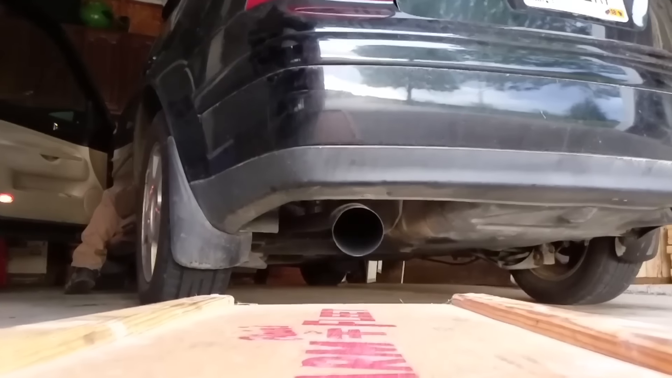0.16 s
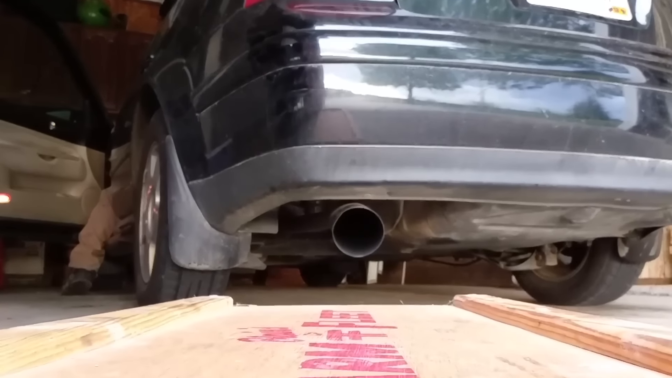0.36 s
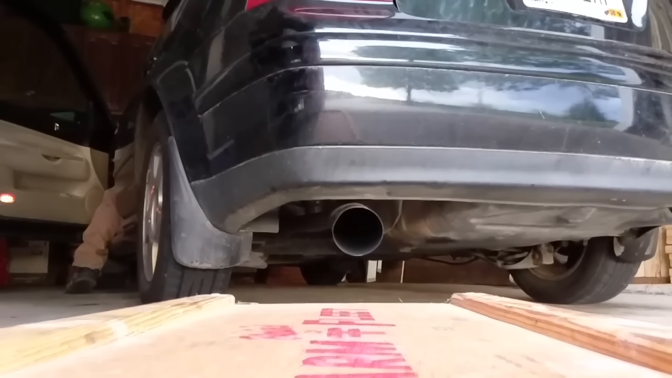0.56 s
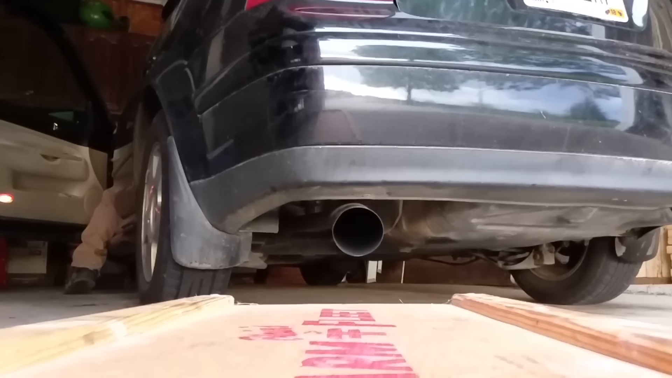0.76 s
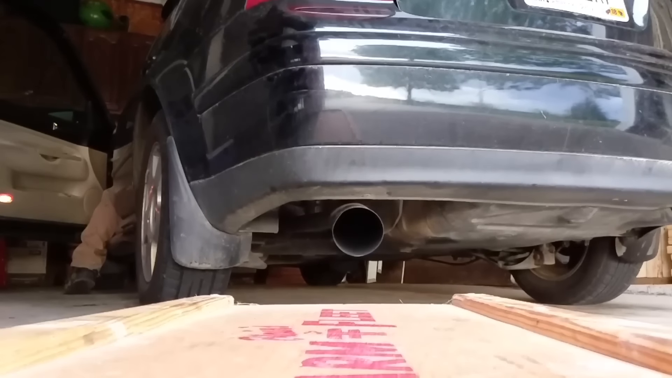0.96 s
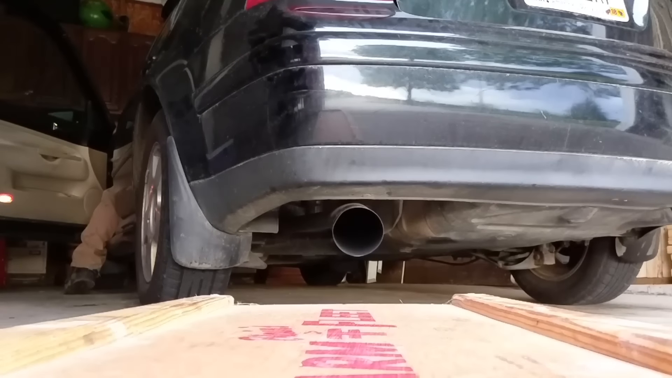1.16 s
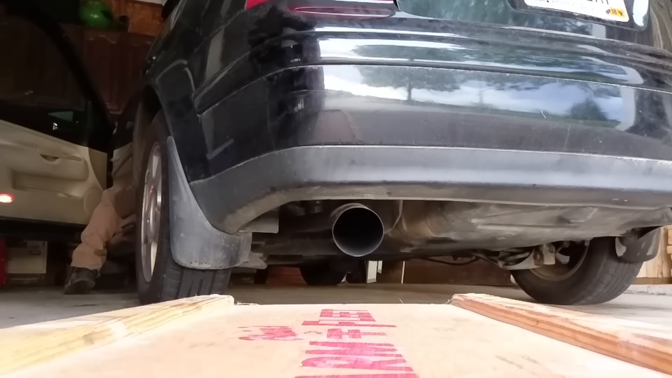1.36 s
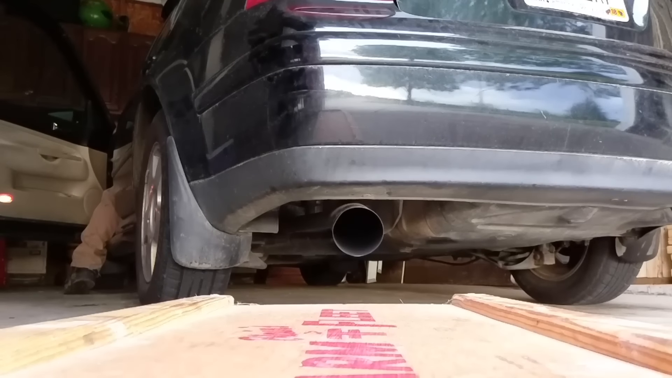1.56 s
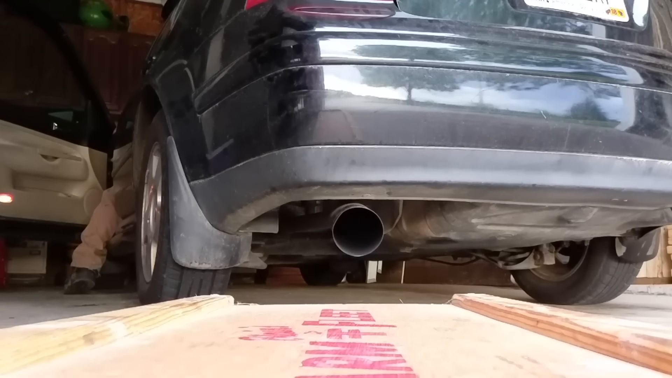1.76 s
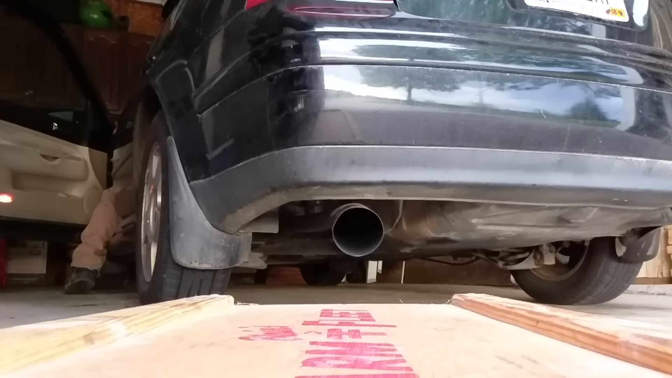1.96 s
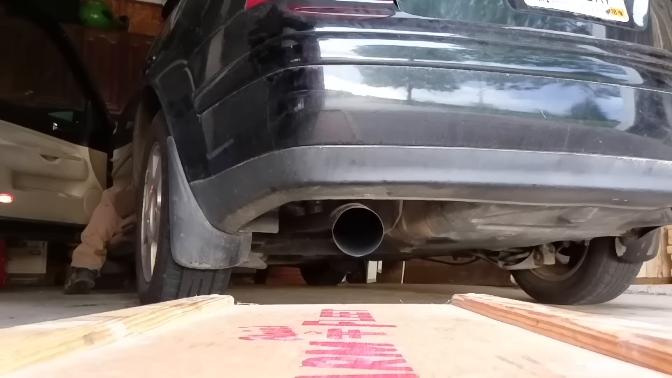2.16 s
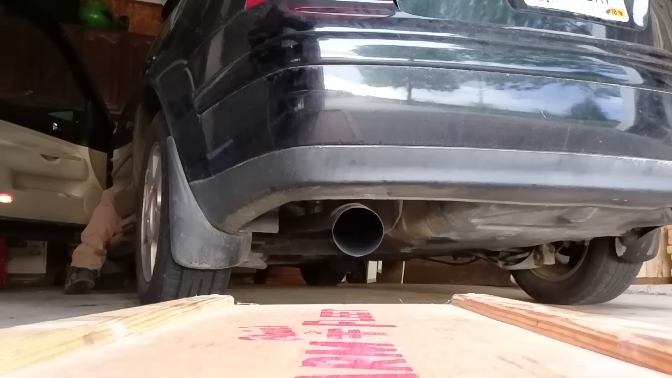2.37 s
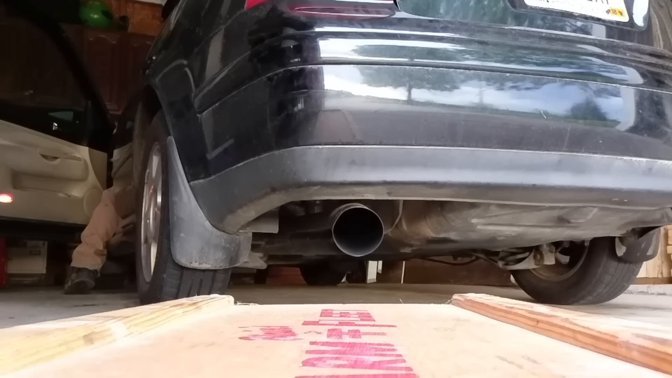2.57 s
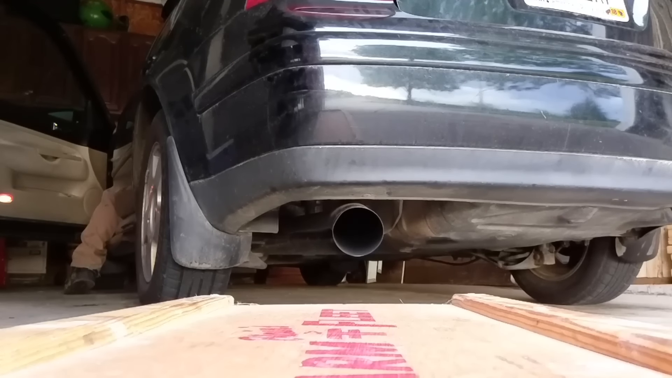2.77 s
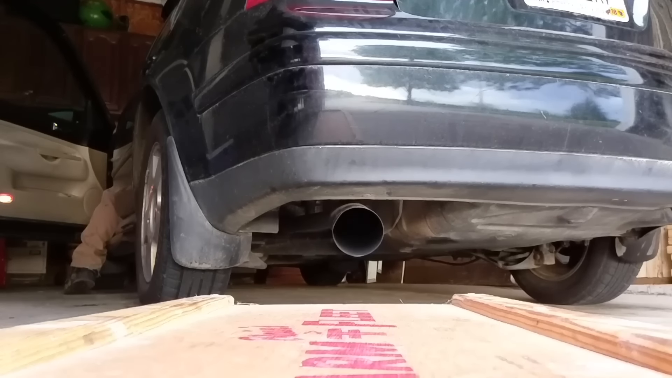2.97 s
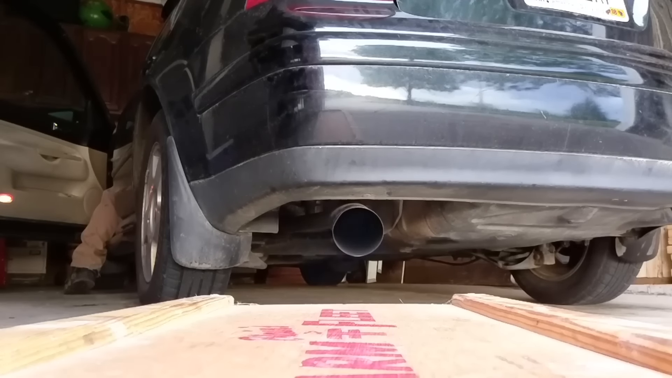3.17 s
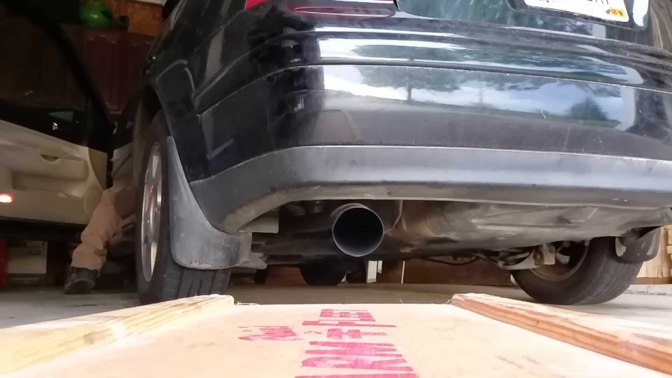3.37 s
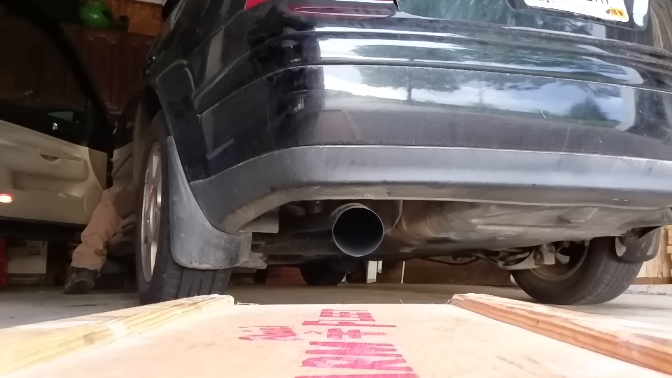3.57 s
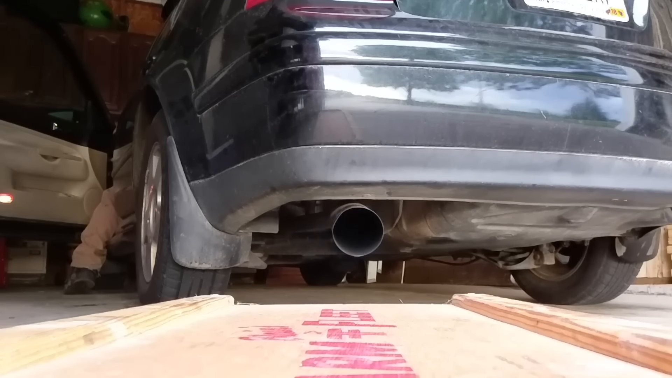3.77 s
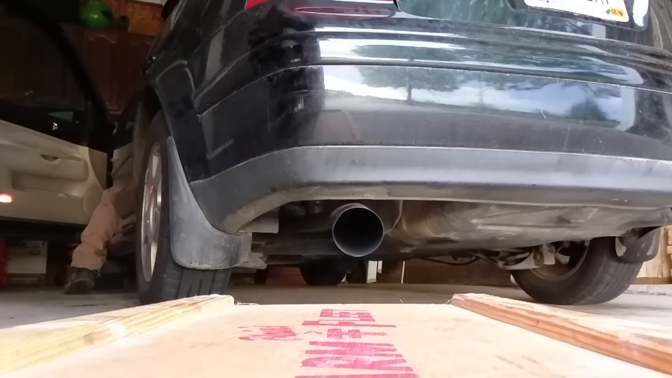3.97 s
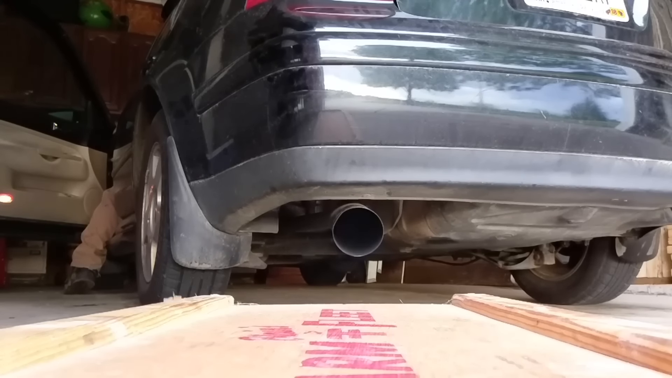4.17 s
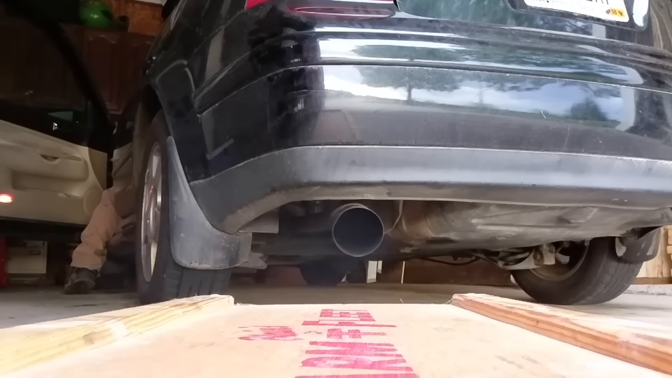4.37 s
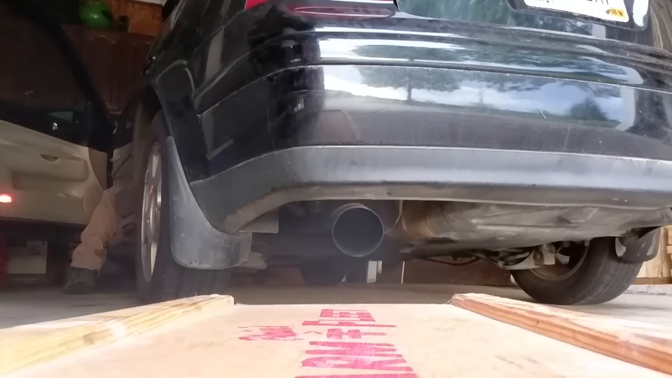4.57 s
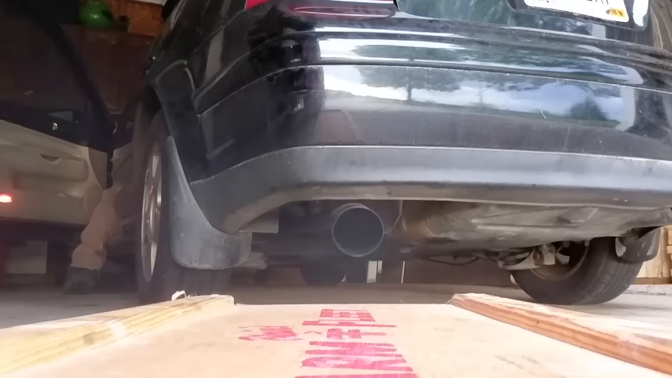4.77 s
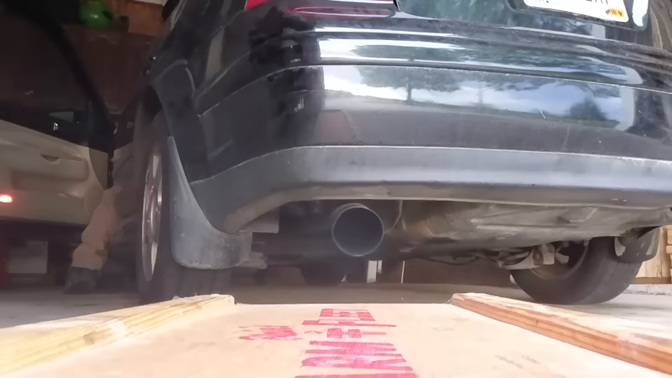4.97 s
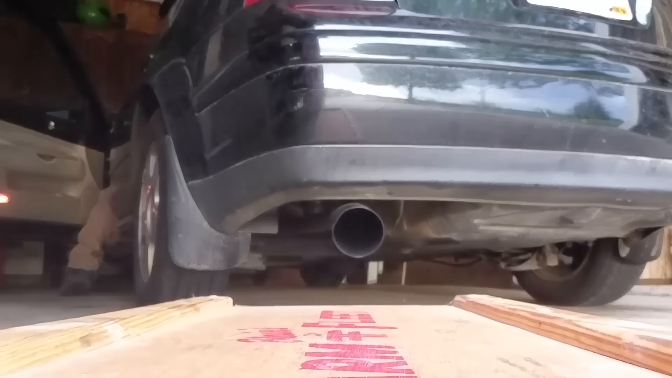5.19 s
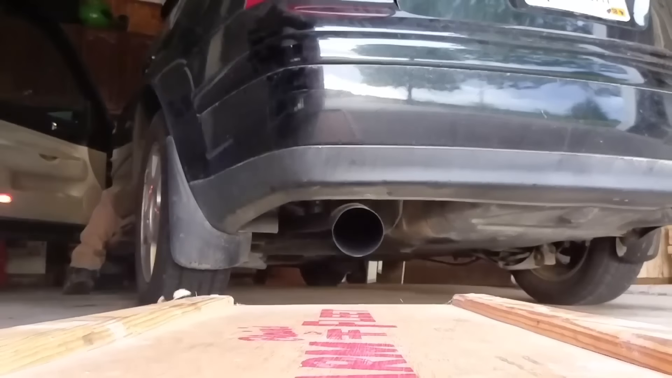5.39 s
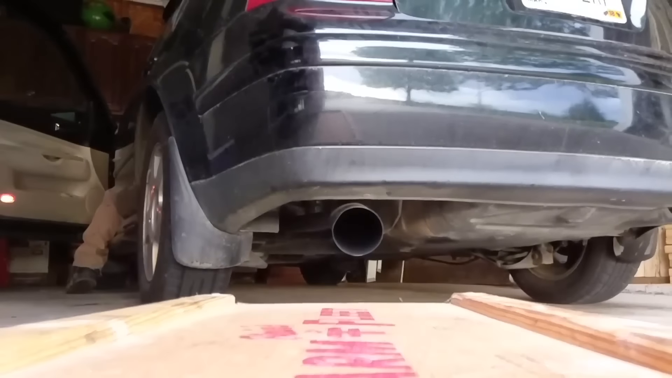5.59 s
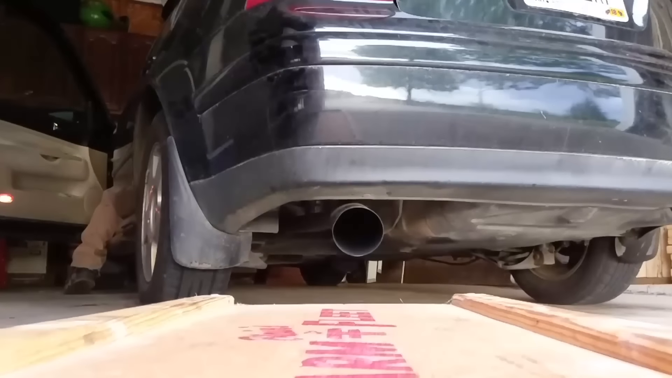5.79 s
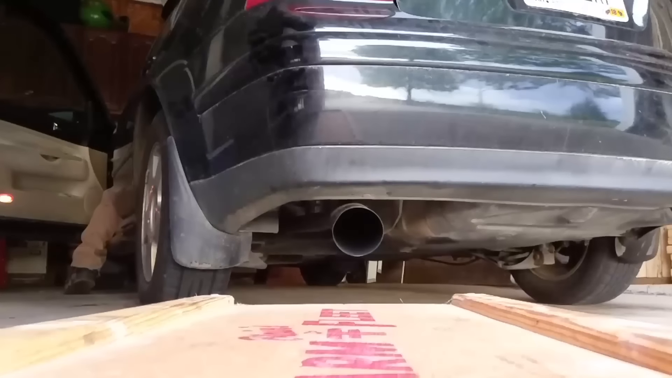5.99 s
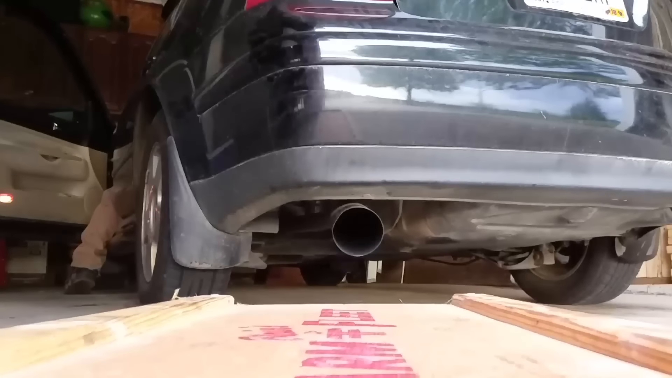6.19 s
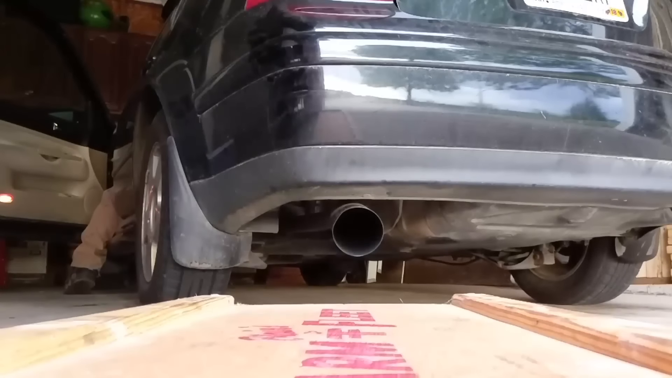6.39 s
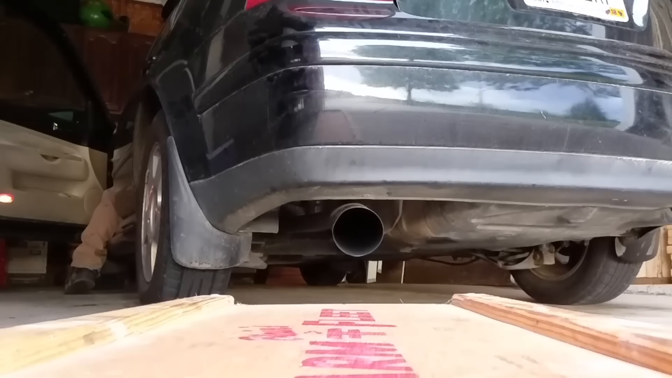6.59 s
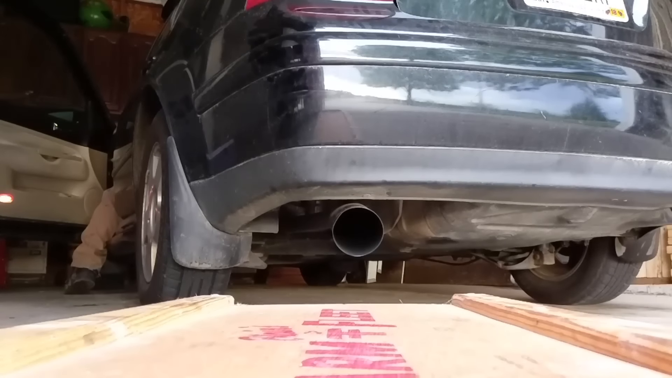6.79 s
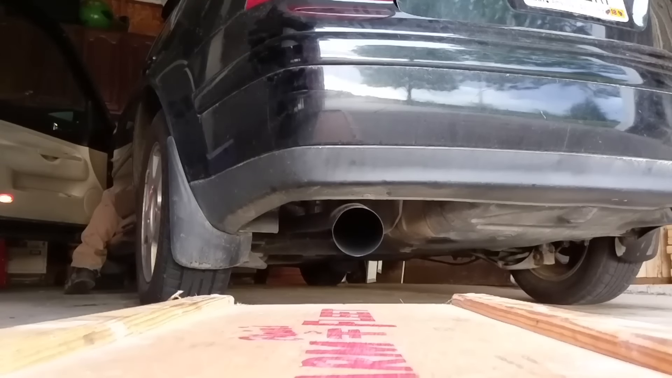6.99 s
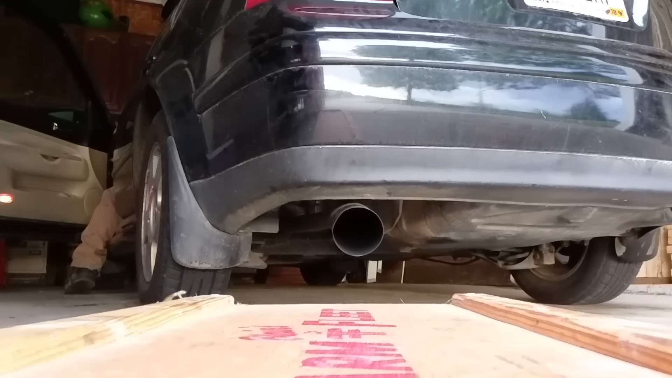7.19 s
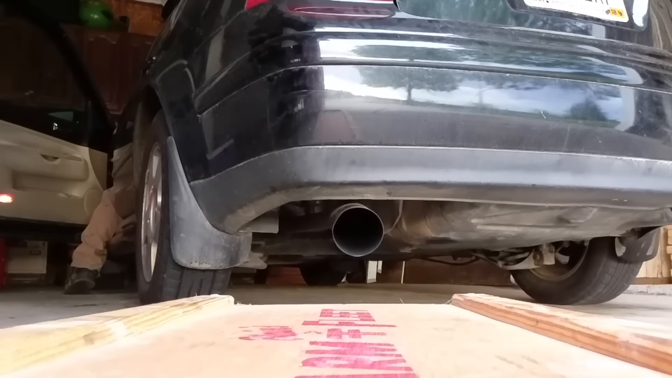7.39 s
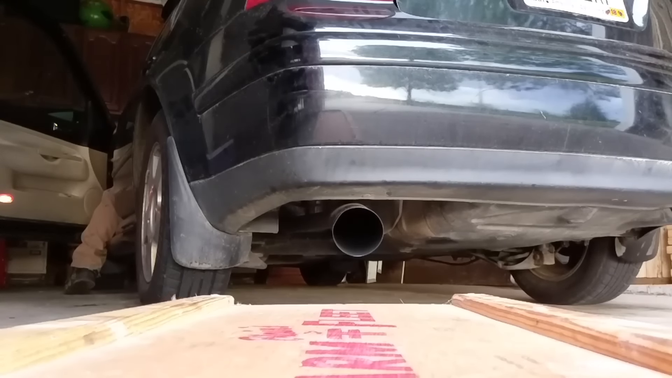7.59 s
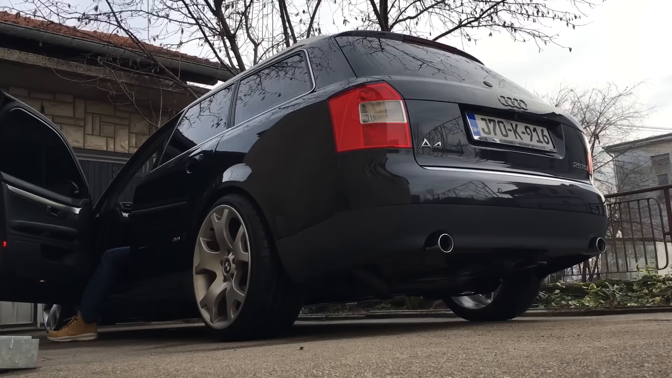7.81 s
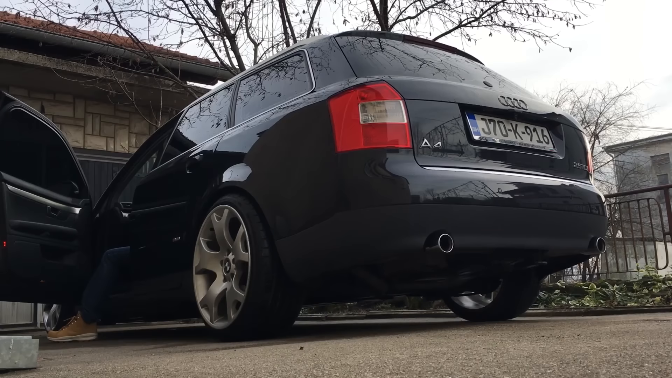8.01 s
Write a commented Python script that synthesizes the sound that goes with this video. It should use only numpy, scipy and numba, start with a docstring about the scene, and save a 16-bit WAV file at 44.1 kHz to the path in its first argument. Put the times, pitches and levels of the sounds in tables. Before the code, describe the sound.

Close behind an open exhaust in a garage: lumpy diesel idle, a short rev, a harder one, whistling turbo run-down, then an abrupt cut outdoors.

```python
"""Turbo diesel revved in a garage

A four-cylinder turbo diesel with an open pipe idles and is revved twice; a two-port camera lies on the floor behind it.
Pressure pulses excite the standing waves of the pipe as thumps; turbulent gas roars and hisses once a cycle.
The turbine whistles at its blade tone, and flow noise howls through the tailpipe as the revs fall.
The scene then cuts to a quiet driveway: shaped noise rumbles and ringing metal starts to rasp."""
import sys
import numpy as np
from scipy import signal
from scipy.fft import rfft, irfft, next_fast_len
from scipy.io import wavfile
from scipy.ndimage import uniform_filter1d
from numba import njit

SR = 44100
rng = np.random.default_rng(int(sys.argv[2]) if len(sys.argv) > 2 else 0)


def unload_audio(sound):
    """Save the sound as a 16-bit wav file, at the path given as the first command line argument."""
    columns = np.transpose(np.atleast_2d(sound))
    # keep every value between -1 and 1, then stretch to whole-number steps
    steps = np.round(np.clip(columns, -1, 1) * 32767)
    wavfile.write(sys.argv[1], SR, steps.astype(np.int16))


N = 355005
T = np.arange(N) / SR


def undb(db):
    """Level to amplitude: 20 dB is a factor of ten."""
    return 10 ** (np.asarray(db) / 20)


def unit(x):
    """Normalisation: scale to rms 1."""
    return x / np.sqrt(np.mean(x ** 2))


def curves(table):
    """Linear interpolation: each column after t/s becomes one value a sample."""
    s, *columns = np.transpose(table)
    return [np.interp(T, s, column) for column in columns]


def bumps(table):
    """Superposition of raised-cosine swells: one track a column after centre t/s and half length/s."""
    at, half, *columns = np.transpose(table)[:, :, None]
    shape = np.cos(np.pi / 2 * np.clip((T - at) / half, -1, 1)) ** 2
    return [np.sum(column * shape, axis=0) for column in columns]


def walk(rate):
    """Random modulation: normal levels held 1 / rate s and smoothed twice, spread near 1."""
    k = int(SR / rate)
    steps = np.repeat(rng.standard_normal(N // k + 1), k)
    return 1.256 * uniform_filter1d(uniform_filter1d(steps, k), k)[:N]


def band(lo_hz, hi_hz):
    """Band-limited noise: white noise filtered between two edges, rms 1."""
    sos = signal.butter(2, [lo_hz, hi_hz], "band", fs=SR, output="sos")
    return unit(signal.sosfilt(sos, rng.standard_normal(N)))


@njit
def svf(x, hz, width):
    """Tuned resonance: a state-variable band-pass with a moving centre, gain 1 there."""
    y, b, l = np.empty(len(x)), 0., 0.  # b and l: states of the two integrators
    for i in range(len(x)):
        g, k = np.tan(np.pi * hz[i] / SR), width / hz[i]
        v = (b + g * (x[i] - l)) / (1 + g * (g + k))
        b, l, y[i] = 2 * v - b, l + 2 * g * v, k * v
    return y


def narrow(hz, width_hz, second_width=1.8):
    """Narrow-band noise: two resonances in series around a moving centre, rms 1."""
    once = svf(rng.standard_normal(N), hz, width_hz)
    return unit(svf(once, hz, second_width * width_hz))


def sweep(table, width_hz):
    """Swept narrow-band noise: follows a (t/s, f/Hz, level/dB) table, silent outside its times."""
    hz, db = curves(table)
    inside = (T >= table[0][0]) * (T <= table[-1][0])
    return narrow(hz, width_hz) * undb(db) * inside


def modes(x, table):
    """Modal superposition: parallel (f/Hz, width/Hz, level/dB) resonances, neighbours opposite in sign."""
    rung = 0
    for k, (hz, width, db) in enumerate(table):
        rung = rung + (-1) ** k * undb(db) * signal.lfilter(*signal.iirpeak(hz, hz / width, SR), x)
    return rung


def puff(turns, depth, at):
    """Periodic flow modulation: a smooth swell once a firing cycle, mean power near 1."""
    return unit(np.exp(depth * np.cos(2 * np.pi * (turns - at))))


# spectral shape of the distant rumble: (f/Hz, relative level per Hz/dB)
DRIVEWAY_SPECTRUM = [(18, -39), (30, -14), (59, -9), (119, -32), (214, -28), (252, -26.5), (318, -39),
                     (848, -46), (1200, -43), (8000, -79), (10400, -113), (17600, -120)]
# course of the rasp: (t/s, level/dB)
RASP_COURSE = [(8.0, -74), (8.015, -42), (8.03, -25.5), (8.05, -35.5)]
# resonances of the rasping metal: (f/Hz, width/Hz, relative level/dB)
RASP_RESONANCES = [(1630, 68, 2.5), (2450, 140, 1), (3000, 38, -3), (3520, 34, 3), (3910, 39, 4),
                   (5400, 94, -9), (6340, 32, -5)]
DRIVEWAY_DB = -33


def driveway():
    """Spectral shaping and modal ringing: noise as distant rumble, then the start of a metal rasp."""
    hz, db = np.transpose(DRIVEWAY_SPECTRUM)
    log_hz = np.log(np.fft.rfftfreq(N, 1 / SR) + 1)
    colour = undb(np.interp(log_hz, np.log(hz), db))
    rumble = unit(irfft(rfft(rng.standard_normal(N)) * colour, N)) * undb(DRIVEWAY_DB)
    ringing = unit(modes(rng.standard_normal(N), RASP_RESONANCES))
    scrape = undb(-2) * band(640, 3900)
    return rumble + (ringing + scrape) * undb(curves(RASP_COURSE)[0])


# gusts of exhaust gas at the microphone: (centre t/s, half length/s, level over steady rumble/dB)
GAS_GUSTS = [(0, 0.43, 14), (1.35, 1, 11), (2.45, 0.21, 10), (4.4, 2, -20), (6, 0.299, 3), (7.55, 0.59, 18)]
BUFFET_DB = -40.5


def buffet():
    """Turbulent pressure: exhaust gas buffets the microphone as gusty rumble, partly shared by the ports."""
    gusts = undb(BUFFET_DB + bumps(GAS_GUSTS)[0] + 2.6 * walk(25))
    common = band(25, 147)
    return gusts * np.array([common + .4 * band(20, 70) for _ in range(2)])


# thin hiss at full boost: (t/s, centre f/Hz, level/dB)
BOOST_NOISE = [(4.55, 12000, -29), (4.85, 11900, -23.5), (5.1, 11570, -21.5), (5.35, 11530, -34)]


def boost_hiss():
    """Swept narrow-band noise: a thin hiss at full boost."""
    return sweep(BOOST_NOISE, 1300.0)


# resonances of the tailpipe and the gap under the car: (f/Hz, width/Hz, relative level/dB)
TAILPIPE = [(405, 113, -14.5), (458, 57, -7.5), (554.4, 38, -5), (618.5, 27, -2.5), (659, 30.4, -2),
            (787, 33, -9.5), (892, 78, -11), (1024, 31.4, -4), (1095, 60, -8), (1207, 59, -9),
            (1432, 107, -14.5), (1521, 64, -8), (1910, 370, -10)]


def tailpipe(x):
    """Modal resonance: ring the tailpipe and the gap under the car."""
    return modes(x, TAILPIPE)


def at_tail(x, through_db):
    """Resonant transmission: loudest at the standing waves of the tailpipe; some passes straight through."""
    return tailpipe(x) * undb(5.5) + undb(through_db) * x


# flow noise against shaft speed: (shaft f/Hz, level before the tailpipe/dB)
SHAFT_NOISE = [(520, -56), (570, -34), (650, -29), (760, -24.5), (900, -25), (1000, -16.5), (1200, -16),
               (1470, -27), (1620, -25), (1750, -50)]
# added level; the noise dies away late in each run-down: (t/s, level/dB)
SHAFT_COURSE = [(0, 5), (.15, -0.5), (.6, 2), (.75, -15), (2.8, -18), (4.6, -2), (6.75, -1), (6.92, -10)]
SHAFT_QUIET_LOAD, SHAFT_DB_PER_LOAD = 0.22, -120  # load where silencing starts, its slope


def shaft_howl(shaft_hz, load):
    """Flow noise tied to rotation: fluttering bands at shaft speed and, when slow, half of it; load silences them."""
    overload = np.maximum(load - SHAFT_QUIET_LOAD, 0)
    db = np.interp(shaft_hz, *np.transpose(SHAFT_NOISE)) + SHAFT_DB_PER_LOAD * overload
    shaft = narrow(shaft_hz, 105.0) + narrow(shaft_hz / 2, 98.0) * (shaft_hz < 900)
    level = undb(db + curves(SHAFT_COURSE)[0] + 1.24 * walk(14))
    return at_tail(shaft * level, through_db=-2.5)


# bursts of the falling howl: (start t/s, level over the howl/dB, length/s)
HOWL_BURSTS = [(4.604, 6, .03), (5.244, 5, 0.027), (5.282, 8.5, 0.027), (5.348, 9.5, .035),
               (5.39, 12.5, 0.066), (5.482, 14, 0.016), (5.514, 8, 0.012), (5.565, 9, 0.047),
               (5.627, 8, .02), (5.681, 5.5, 0.034), (5.716, 6, 0.014), (5.781, 6.5, 0.031),
               (5.837, 10.5, 0.097), (5.935, 5.5, 0.059), (5.989, 14, .02), (6.016, 9, 0.018),
               (6.049, 7, .03), (6.093, 9, .03), (6.139, -1, .02), (6.165, 8, 0.034)]
BURST_RISE_S = .003


def bursts():
    """Level modulation in dB: each burst jumps up, holds and sinks back."""
    at, db, length = np.transpose(HOWL_BURSTS)[:, :, None]
    since = np.maximum(T - at, 0)
    rise = np.clip(since / BURST_RISE_S, 0, 1)
    return np.max(db * rise * np.exp(-(since / length) ** 2), axis=0)


# falling band of flow noise after the last rev: (t/s, centre f/Hz, base level/dB)
FALLING_BAND = [(4.5, 1210, -40), (4.65, 1200, -18), (4.85, 1040, -18), (5, 887.4, -13.5),
                (5.15, 778.4, -13.5), (5.3, 685, -19.5), (5.6, 655, -18.5), (5.9, 625, -19),
                (6.2, 575, -21), (6.3, 468, -35), (6.5, 400, -42)]
HOWL_TONE_DB, BETWEEN_BURSTS_DB = 5.5, -7.5  # wavering tone over base level; howl between bursts
BREAKS_S = 5.2  # the howl is fully locked into a tone here


def falling_howl(turns, waver_hz=55):
    """Lock-in: falling flow noise gains a wavering tone as it breaks into bursts; each firing makes it burble."""
    hz, db = curves(FALLING_BAND)
    broken = np.clip((T - BREAKS_S) / 0.14 + 1, 0, 1)
    phase = 2 * np.pi * np.cumsum(hz + waver_hz * walk(320)) / SR
    tone = np.sqrt(2) * np.sin(phase) * (T <= FALLING_BAND[-1][0])
    noise = at_tail(sweep(FALLING_BAND, 152.0), through_db=-5.5)
    sound = noise + broken * tone * undb(db + HOWL_TONE_DB)
    level = undb(bursts() + BETWEEN_BURSTS_DB * broken + 1.4 * walk(7.5))
    return sound * level * puff(turns, 0.16, 0.32)


# course of the turbine: (t/s, blade tone f/Hz)
BLADE_TONE = [(0, 9470), (1.75, 5100), (2.751, 4513), (2.93, 4990), (3.04, 5860), (3.121, 7260),
              (3.189, 9170), (3.262, 10010), (3.5, 12200), (3.651, 12180), (3.9, 11620), (4.05, 13310),
              (4.26, 16380), (4.9, 20960), (5.1, 19780), (5.6, 15730), (6.7, 7998), (7.861, 5700)]
TURBO_IDLE_HZ, BLADES = 4290, 12.34  # idle blade tone; blade tone over shaft speed


def spool():
    """Free decay towards idle: blade tone above its idle pitch in Hz, interpolated on a log scale."""
    s, hz = np.transpose(BLADE_TONE)
    return np.exp(np.interp(T, s, np.log(np.maximum(hz - TURBO_IDLE_HZ, 20))))


# base level of the whistle: (blade tone f/Hz, coasting level/dB, full-load level/dB)
WHISTLE_LEVEL = [(4600, -44, -29), (5100, -30.5, -14), (6400, -34, -7), (6970, -37.5, -5),
                 (8170, -39.5, -22), (8060, -31.5, -12), (9940, -17, -23), (10692, -24.5, -29),
                 (12007, -23.5, -24), (14530, -24, -11), (16020, -22, -30)]


def turbine(blade_hz, turns, load, wobble_hz=40, drift_hz=55, breath_db=-10):
    """Frequency modulation: each firing kicks wheel and gas, so the blade tone wobbles; load at speed frays it."""
    at, coast_db, driven_db = np.transpose(WHISTLE_LEVEL)
    coasting = (1 - load) * np.interp(blade_hz, at, coast_db)
    driven = load * np.interp(blade_hz, at, driven_db)
    fray = load * np.clip((blade_hz - TURBO_IDLE_HZ) / 5500, 0, 1)
    wobble = wobble_hz * (1 + 2.7 * fray) * np.cos(2 * np.pi * (turns - .3))
    hz = np.minimum(blade_hz, SR / 2.4) + wobble
    drift = drift_hz * (1 + 8.0 * fray) * walk(400)
    tone = np.sqrt(2) * np.sin(2 * np.pi * np.cumsum(hz + drift) / SR)
    breath = unit(svf(svf(rng.standard_normal(N), hz, 680.0), hz, 1200.0)) * undb(breath_db + 15.0 * fray)
    level = undb(coasting + driven - 2.3 * fray + 1.5 * walk(40))
    return (tone + breath) * puff(turns, 0.37, 0.76) * level


# swells and dips of the gas: (centre t/s, half length/s, gas level/dB, treble level/dB, roar level/dB)
GAS_SWELLS = [(2.88, 0.19, 6.5, -1, 1), (3.06, 0.12, 4.5, 2, 4), (3.22, 0.059, -3.5, -2, 1),
              (3.44, 0.16, 7, -1, -3), (3.67, 0.23, 3.5, -3.5, -3.5), (3.93, 0.096, 7.5, 0.5, -6.5),
              (4.12, 0.092, 4.5, -5, -3), (4.36, 0.16, 5, -6.5, -2.5), (4.48, 0.08, -1, -1, 2.5),
              (4.62, .09, -2, 1.5, 3), (4.79, 0.29, -0.5, -7.5, -0.5), (5.05, 0.18, 1, -1, -5.5)]
HISS_DB = -30  # base level of hiss and roar together
TREBLE_DB, TREBLE_DB_PER_LOAD = -0.5, 9
ROAR_DB, ROAR_DB_PER_KHZ = -3.5, 1.19  # grows with the blade tone above idle


def gas_noise(turns, firing_hz, load, boost_hz):
    """Turbulence noise: gas hisses in two bands and roars through the resonances, swelling with each firing."""
    swell_db, bright_db, growl_db = bumps(GAS_SWELLS)
    treble_db = TREBLE_DB + TREBLE_DB_PER_LOAD * load + bright_db
    middle = band(1130, 4900) * undb(3.0 + 0.57 * walk(11))
    treble = band(5100, 14500) * undb(treble_db + 1.9 * walk(16))
    hiss = (middle + treble) * puff(turns, .33, .76)
    flow = band(133, 1290)
    resonant = unit(tailpipe(flow) + undb(-5.0) * pipe(flow, firing_hz, load))
    roar_db = ROAR_DB + ROAR_DB_PER_KHZ * boost_hz / 1000 + 1.2 * load + growl_db
    roar = resonant * undb(roar_db + 1.94 * walk(11)) * puff(turns, .24, .85)
    return (hiss + roar) * undb(HISS_DB + swell_db + 0.73 * walk(13))


# standing waves of the pipe before the pitch ratio:
# (f/Hz, width/Hz, idle level/dB, level gain per 100 Hz of firing rate/dB, level gain at full load/dB)
PIPE_WAVES = [(31.5, 10, -9, 2, 7.5), (62.3, 11.5, -4.5, -13, -5), (77.6, 9, -7, 7.5, -0.5),
              (126.5, 10.2, 3.5, 3.5, 0.5), (184.2, 21.5, 4, -5, 0), (209.1, 12.6, -5.5, -4, 6),
              (255.7, 18, -22, 21.5, 18), (312.5, 18.2, -14, 2.5, 7.5), (374, 61, -24.5, 17, 0)]
COLD_PITCH, HOT_PITCH = 0.96, 1.082  # pitch ratio at no load and full load
IDLE_HZ = 30.5  # firing rate at idle


def pipe(x, firing_hz, load):
    """Standing waves: hot fast gas raises their pitch and wakes the upper ones."""
    ratio = COLD_PITCH + (HOT_PITCH - COLD_PITCH) * load
    rung = 0
    for hz, width, db, fast_db, load_db in PIPE_WAVES:
        level_db = db + fast_db * (firing_hz - IDLE_HZ) / 100 + load_db * load
        rung = rung + undb(level_db) * svf(x, hz * ratio, 1. * width)
    return rung


def push(pulses, push_s):
    """Impulse smoothing: two equal exponential decays of time constant push_s round each pulse."""
    pole = [1, -np.exp(-1 / (push_s * SR))]
    return unit(signal.lfilter([1], np.convolve(pole, pole), pulses))


# push of each cylinder in firing order before load widens the spread: (relative level/dB)
CYLINDER_LEVELS = [-0.3, 0.5, -1, 0.2]
IDLE_TOP_HZ, PIPE_TOP_HZ = 297, 520  # low-pass edges of the dull and the open thump
OPENS_OVER_HZ = 22  # rise of firing rate that opens the thump


def thump(turns, hz, load, scatter_db=0.6, rough_db=.7, jitter_s=.0001, stagger_s=.0002):
    """Impulse excitation: one push a firing rings the pipe, uneven with load, brighter with firing rate."""
    at = np.flatnonzero(np.diff(turns.astype(int), prepend=0))
    order = np.arange(len(at))
    size_chance, time_chance = rng.standard_normal((N // 100, 2))[:len(at)].T
    cylinder_db = np.array(CYLINDER_LEVELS)[order % 4] * (1 + 0.53 * load[at])
    size_db = cylinder_db + (scatter_db + rough_db * load[at]) * size_chance
    late_s = jitter_s * load[at] * time_chance + stagger_s * (-1.) ** order
    when = np.clip(at + late_s * SR, 0, N - 1).astype(int)
    pulses = np.bincount(when, undb(size_db), N)
    rung = pipe(push(pulses, push_s=.0005), hz, load)
    dull = signal.sosfilt(signal.butter(4, IDLE_TOP_HZ, fs=SR, output="sos"), rung)
    bright = signal.sosfilt(signal.butter(4, PIPE_TOP_HZ, fs=SR, output="sos"), rung)
    opening = np.clip((hz - IDLE_HZ) / OPENS_OVER_HZ, 0, 1)
    return unit(dull + opening * (bright - dull))


# course of the engine: (t/s, firing rate f/Hz, load 0-1, firing level/dB)
ENGINE_REVS = [(0, 31.9, 0.28, -18), (.3, 32.4, 0.08, -17.5), (1, 30.78, 0, -19.5), (2.75, 30.2, 0, -19.5),
               (2.79, 32.05, 0.51, -12.5), (2.89, 40.17, 0.72, -11), (2.98, 46, 0.77, -9.5),
               (3.15, 66.8, 0.73, -14), (3.26, 77, 1, -15.5), (3.35, 82.4, 0.82, -11),
               (3.5, 77.8, 0.62, -9), (3.9, 55.66, 0.47, -12), (4.12, 81.87, 1, -9.5),
               (4.33, 109.5, 0.98, -11.5), (4.46, 123.8, 0.71, -18), (4.6, 135.4, 0.55, -15.5),
               (4.84, 123.6, 0.21, -17.5), (5.1, 99.45, 0.15, -13.5), (5.54, 68.05, 0.27, -16.5),
               (5.98, 42.26, 0.21, -13.5), (6.3, 35.5, 0.05, -20.5), (7, 33, 0.08, -19),
               (7.86, 30.1, 0, -20.5)]


def exhaust():
    """Superposition at the outlet: thumps, gas, howls and whistle share the firing cycle, load and turbine speed."""
    hz, load, firing_db = curves(ENGINE_REVS)
    load = np.clip(load, 0, 1)
    boost_hz = spool()
    blade_hz = TURBO_IDLE_HZ + boost_hz
    turns = np.cumsum(hz * (1 + 0.0016 * walk(15))) / SR  # firing cycles so far
    firings = thump(turns, hz, load) * undb(firing_db)
    gas = gas_noise(turns, hz, load, boost_hz)
    howl = shaft_howl(blade_hz / BLADES, load) + falling_howl(turns)
    whistle = turbine(blade_hz, turns, load) + boost_hiss()
    return firings + gas + howl + whistle


# floor bounce and housing:
# (f/Hz, left level/dB, right level/dB, left lead before low-frequency taper/rad, share of direct sound 0-1)
PORT_RESPONSE = [(32, -4.5, -6, -0.4, 1), (182, 3.5, 2.95, 0.46, 0.99), (334, -2.5, -3, 0.42, 0.97),
                 (527, 2.5, 2.5, 0.35, 0.96), (677, 3, 1.5, .5, .93), (970, 1, -3, -0.13, 0.58),
                 (1487, 1, 6, 2.5, 0.25), (1930, -3, -9.5, 1.94, 0.84), (2800, 5, 3, -2, 0.7),
                 (3940, -4, -2, 0.5, 0.97), (4630, -15, -13.5, 1.7, 0.52), (6040, -16.5, -11, -1.1, 0.47),
                 (7280, -8.5, 3.5, 3, 1), (7920, 0.5, 5.5, 3, 0.55), (8680, -2, 0.5, 4, 0.83),
                 (9780, 7.5, -3.5, 4.5, 1), (11140, -5, -14.5, 4, 0.62), (13000, -12.5, -14, 5, 0.4),
                 (16000, -37, -35, -24, 0.3)]
GARAGE_T60_S = 0.4


def ports(sound):
    """Direct and reverberant field: each port has its own colour, phase lag and mix of garage echoes."""
    size = next_fast_len(N + SR)
    log_hz = np.log(np.fft.rfftfreq(size, 1 / SR) + 1)
    hz, *columns = np.transpose(PORT_RESPONSE)
    left_db, right_db, lead, direct = (np.interp(log_hz, np.log(hz), c) for c in columns)
    lead = lead * np.minimum(np.exp(log_hz) / 500, 1)  # long waves reach both ports together
    direct = np.clip(direct, 0, 1)
    tail = rng.standard_normal((2, SR // 2)) * undb(-60 * T[:SR // 2] / GARAGE_T60_S)
    echoes = rfft(tail / np.sqrt(np.sum(tail ** 2, axis=1, keepdims=True)), size)
    lag = np.exp(.5j * np.array([lead, -lead]))  # half the lead to each port
    response = undb([left_db, right_db]) * (np.sqrt(direct) * lag + np.sqrt(1 - direct) * echoes)
    return irfft(rfft(sound, size) * response, size)[:, :N]


CUT_S = 7.862  # the garage is silent from here on


def scene():
    """Crossfade: the garage gives way to the driveway within 4 ms."""
    garage = np.clip((CUT_S - T) / .004, 0, 1)
    return garage * (ports(exhaust()) + buffet()) + (1 - garage) * driveway()


GAIN_TOP_DB, GAIN_SHARE = -10, 0.56  # level where gain control starts, share of the excess removed
GAIN_S, TOP_HZ = .03, 15770  # memory of the gain control; upper band edge


def record(dry):
    """Compression and band limiting: the camera turns loud passages down, rounds peaks and cuts the top."""
    pole = np.exp(-1 / (GAIN_S * SR))
    power = signal.lfilter([1 - pole], [1, -pole], np.mean(dry ** 2, axis=0))
    level_db = 10 * np.log10(power + 1e-9)
    held = dry * undb(-GAIN_SHARE * np.maximum(level_db - GAIN_TOP_DB, 0))
    rounded = np.tanh(.9 * held) / .9
    return signal.sosfilt(signal.ellip(12, .2, 80, TOP_HZ, fs=SR, output="sos"), rounded)


dry = scene()
out = record(dry)
unload_audio(out)
```